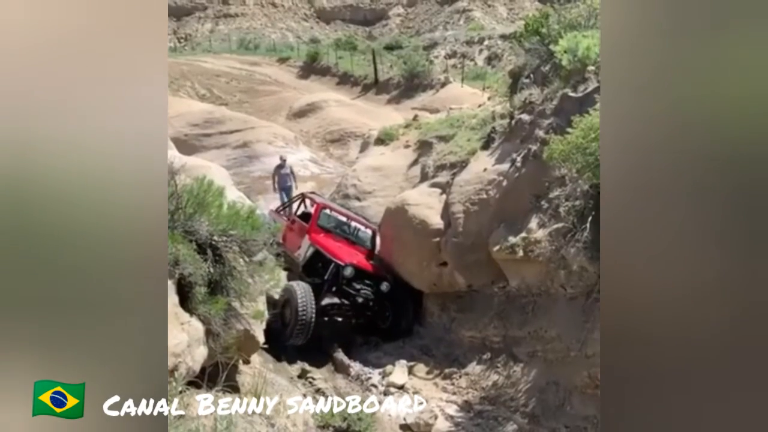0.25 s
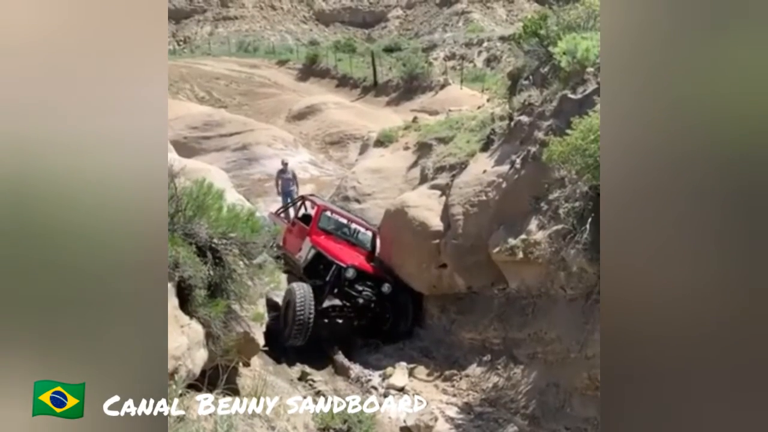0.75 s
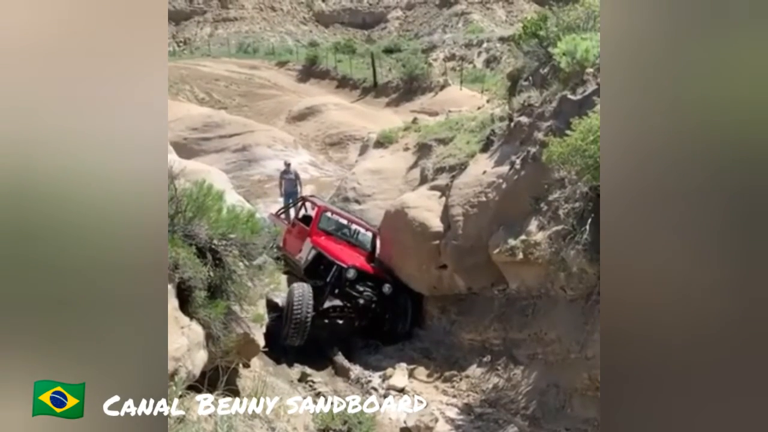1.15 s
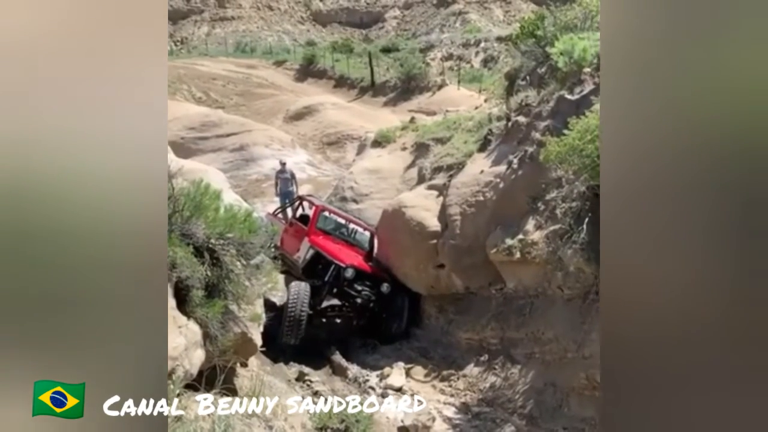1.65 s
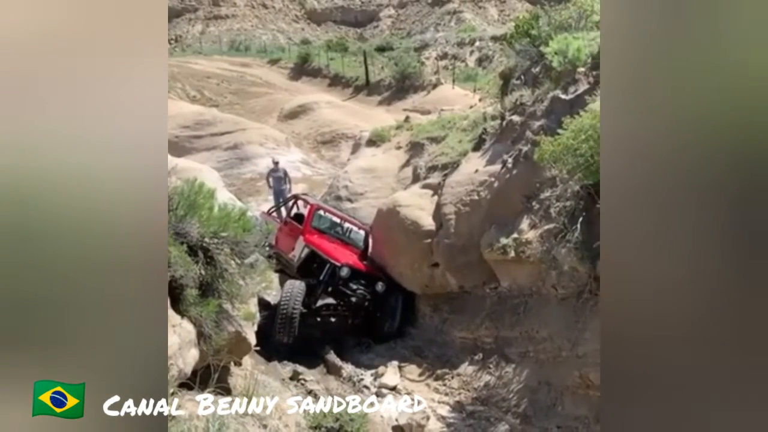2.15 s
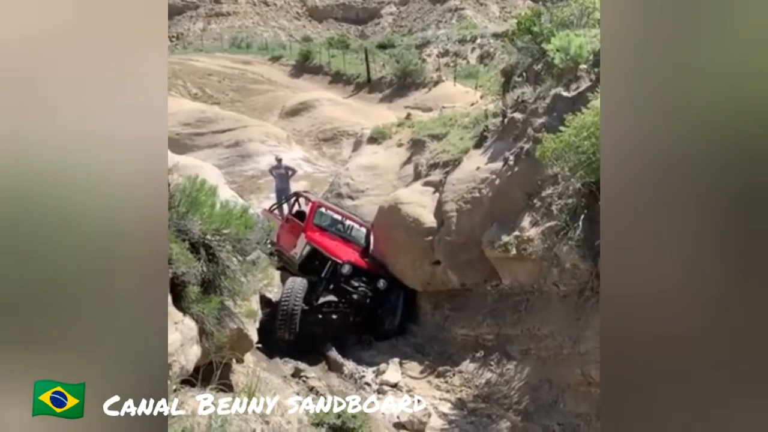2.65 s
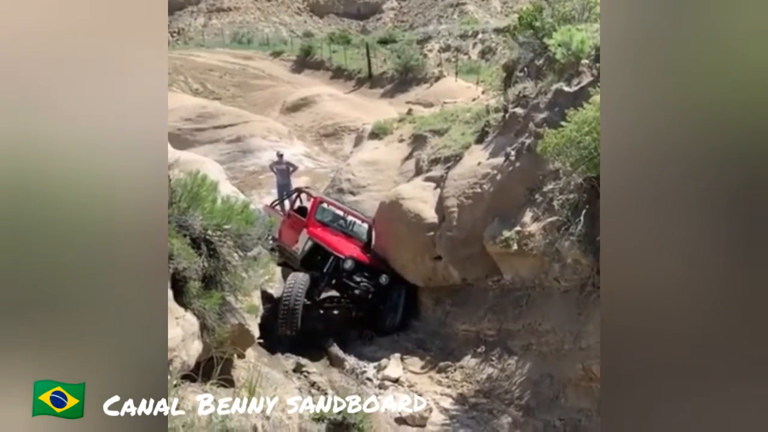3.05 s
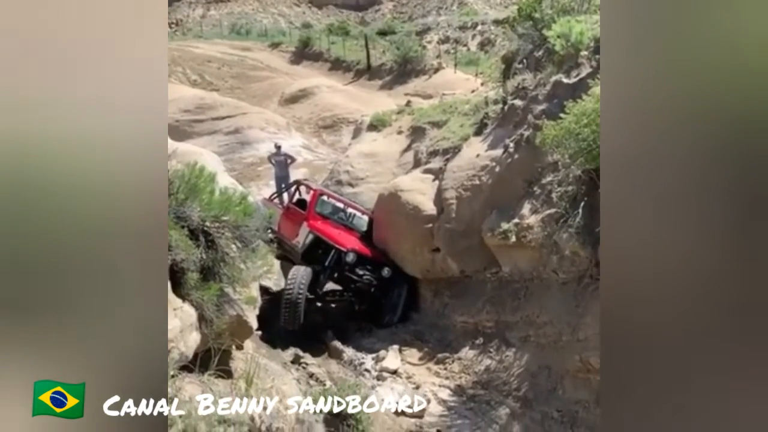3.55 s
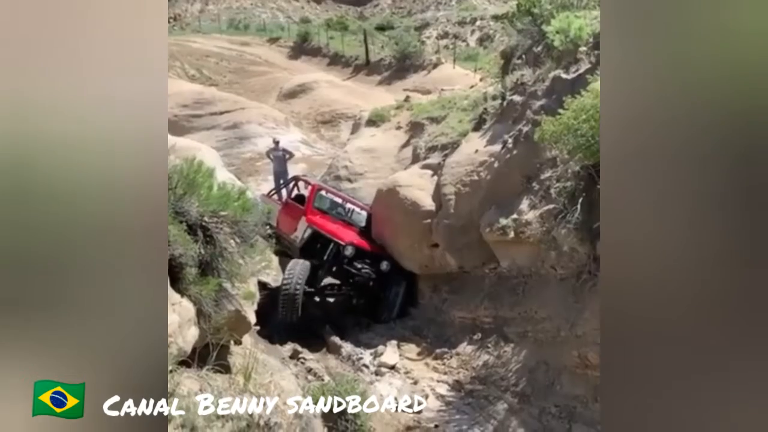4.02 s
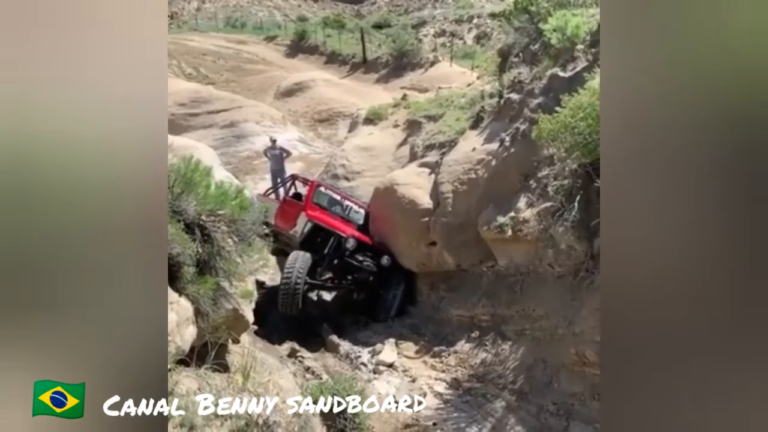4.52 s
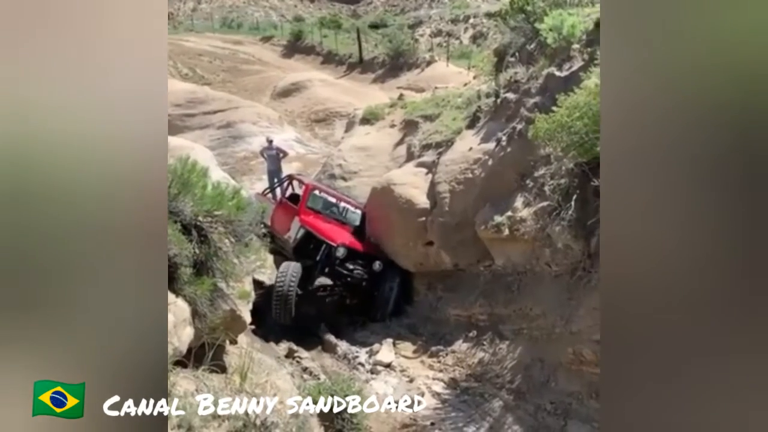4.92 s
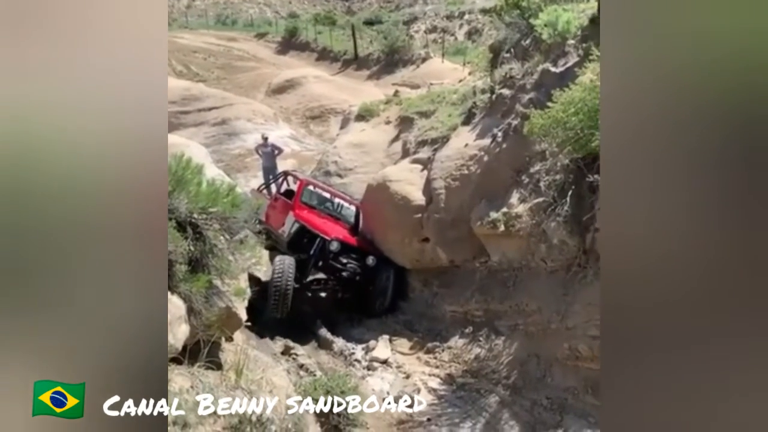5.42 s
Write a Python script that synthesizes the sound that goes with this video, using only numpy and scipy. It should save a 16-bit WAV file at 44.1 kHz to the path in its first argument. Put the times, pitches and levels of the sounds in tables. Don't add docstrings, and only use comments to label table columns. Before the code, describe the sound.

One mono microphone across a rocky gully hears a six-cylinder off-road vehicle. At the start the engine note falls, with an unsteady panel drone, and short grainy tyre scuffs on rock come at about 0.4 and 0.5 s. By 1.1 to 1.3 s it has lugged down to a slow, low throb. From 1.5 s the throttle opens and the pitch climbs quickly, pausing briefly near 3.0 to 3.3 s, then rising again into a strong tonal exhaust boom. Uneven burble, fan rush and valve hiss grow with it, and the panel hums around 2.5 to 3.5 s. A small metallic knock and rattle occur at 4.3 s. The engine peaks near 4.65 s as the driver lifts off; firing stumbles, a low chassis thump lands at 4.9 s, and the pitch falls. Rapid bright loose-metal ticks chatter from 5.45 to 5.65 s. Treble is muted at the very top.

```python
import sys
import numpy as np
from scipy import signal
from scipy.fft import rfft, irfft, next_fast_len
from scipy.io import wavfile
from scipy.ndimage import uniform_filter1d, map_coordinates

SR = 44100
rng = np.random.default_rng(int(sys.argv[2]) if len(sys.argv) > 2 else 0)


def output_pcm(signal):
    pcm = np.clip(np.atleast_2d(signal).T, -1, 1) * 32767
    wavfile.write(sys.argv[1], SR, np.round(pcm).astype(np.int16))


def volts(x):
    e = np.asarray(x, float) / 20
    return 10 ** e


N = 250399
T = np.arange(N) / SR
CRUISE_HZ = 80

# (frequency [Hz], level [dB])
PIPE = [(20, -16.5), (45, -7), (75, -14.5), (110, 0.5), (135, -3), (160, -3.5), (190, 6), (215, -1),
        (238, -3.5), (280, -8.5), (325, -4.5), (380, -24.5), (470, -21), (700, -74)]


def unit(x):
    return x / np.sqrt(np.mean(x ** 2) + 1e-20)


def along(points, hz):
    f, v = np.transpose(points)
    return np.interp(np.log(hz + 1), np.log(f + 1), v)


def curve(rows):
    s, v = np.transpose(rows)
    return np.interp(T, s, v)


def wobble(rate):
    return map_coordinates(rng.standard_normal(int(N * rate / SR) + 4), [T * rate])


def coloured(x, spectrum, smear=0):
    m = next_fast_len(N + 8192)
    hz = np.fft.rfftfreq(m, 1 / SR)
    inside = (hz >= spectrum[0][0]) & (hz <= spectrum[-1][0])
    delay = np.exp(-1j * np.pi * smear * hz ** 2)
    return irfft(rfft(x, m) * volts(along(spectrum, hz)) * inside * delay, m)[:N]


def noise(spectrum, patchy_db):
    z = signal.stft(rng.standard_normal(N), nperseg=512)[2]
    field = uniform_filter1d(rng.standard_normal(z.shape), size=5, axis=0)
    field = uniform_filter1d(field, size=9, axis=1)
    patchy = signal.istft(z * volts(patchy_db * unit(field)), nperseg=512)[1][:N]
    return unit(coloured(patchy, spectrum))


def driven(hz, throttle, cruise_db, per_octave_db, opened_db):
    return cruise_db + per_octave_db * np.log2(hz / CRUISE_HZ) + opened_db * throttle


def panel_hum():
    # (start [s], end [s], level [dB])
    hums = [
        (-.1, .55, -39.5),
        (0.96, 1.25, -36),
        (2.484, 3.55, -32.5),
    ]
    fade_db_per_s, floor_db = 56.5, -50
    outside = lambda start, end: np.maximum(np.maximum(start - T, T - end), 0)
    hum = sum(volts(level - fade_db_per_s * outside(start, end)) for start, end, level in hums)
    unsteady = volts(5.9 * np.tanh(wobble(17)))
    return (hum + volts(floor_db)) * np.sqrt(2) * unsteady * np.sin(2 * np.pi * 236 * T + 1.24 * wobble(14))


def loose_metal():
    # (time [s], peak level [dB])
    ticks = [(4.303, -49), (4.329, -32), (4.732, -38), (5.4484, -28), (5.474, -52), (5.4979, -35),
             (5.523, -27), (5.5464, -38), (5.57, -23.5), (5.5914, -29.5), (5.608, -42), (5.629, -25),
             (5.651, -51)]
    # (time [s], level [dB], decay by 60 dB [s])
    clank = [
        (4.28, -46, 1.6),
        (4.324, -44, 0.24),
    ]
    # (frequency [Hz], level [dB])
    metal = [(2500, -20), (3600, -1), (5000, -4), (6200, 0), (7500, -6), (8500, -5), (11500, -16)]
    burst = lambda s, level, t60: (T >= s) * volts(level - 60 * abs(T - s) / max(t60, .002))
    shape = sum(burst(s, peak - 12.5, .026) for s, peak in ticks)
    shape = shape + sum(burst(*row) for row in clank)
    return shape * noise(metal, patchy_db=4.5)


def tyre_scuffs():
    # (time [s], half length [s], level [dB])
    scuffs = [
        (.362, .016, -26.5),
        (.389, .013, -24.5),
        (.5, .018, -29.5),
        (2.659, .003, -30),
    ]
    # (frequency [Hz], level [dB])
    rubber = [(400, -18), (590, 5), (730, -4), (880, 2), (1100, -4), (1300, -2), (1650, -5), (2200, -7),
              (2700, -17), (3300, -30), (4500, -40)]
    grit = noise(rubber, patchy_db=.5)
    return grit * sum(volts(level) * np.exp(-((T - s) / half) ** 2) for s, half, level in scuffs)


def chassis_jolt():
    # (time [s], level [dB], pitch [Hz], decay by 60 dB [s])
    thumps = [
        (4.92, -15, 42, .08),
    ]
    return sum(volts(level - 60 * abs(T - s) / t60) * np.sin(2 * np.pi * pitch * (T - s))
               for s, level, pitch, t60 in thumps)


def engine_bay(hz, throttle, firings):
    # (frequency [Hz], density [dB per Hz])
    fan = [(300, -33), (383, -16), (460, -5), (590, -13.5), (690, -8.5), (751, -1), (810, -7), (903, -14),
           (1260, -12), (1620, -16), (1900, -17), (2400, -22), (3000, -31), (3900, -57)]
    valves = [(1410, -0.5), (2400, -11.5), (2550, -18), (3070, -3), (3670, -1.5), (4760, -11.5),
              (6120, -7.5), (7220, -11.5), (8330, -8), (9950, -15.5), (11300, -14.5), (12000, -21),
              (12300, -47), (16000, -73), (22000, -120)]
    intake = [(280, -19), (350, -2.5), (560, 1), (700, -8), (1000, -7), (2200, -10.5), (2450, -27),
              (3000, -36)]
    panel = [(1820, -45), (1900, 4), (1945, 0.5), (2020, -14.5)]  # (Hz, dB)
    fan_db = driven(hz, throttle, -33.5, 0.9, .6)
    valves_db = driven(hz, throttle, -46.5, 4.4, 0.37)
    panel_db = fan_db + driven(hz, throttle, -16.5, 5, 0.96) - 4.0
    panel_db = panel_db + 8.5 * np.exp(-((hz - 126.8) / 5) ** 2)
    intake_db = driven(hz, throttle, -42.5, 10, 0.89)

    throb = lambda depth: 1 + depth * np.cos(2 * np.pi * firings) + depth * np.cos(np.pi * firings)
    rush = volts(fan_db + 0.89 * wobble(9)) * throb(0.088) * noise(fan, patchy_db=1.4)
    hiss = volts(valves_db + 0.83 * wobble(10)) * throb(0.073) * noise(valves, patchy_db=2.0)
    ring = volts(panel_db) * noise(panel, patchy_db=0.0)
    roar = volts(intake_db + 0.64 * wobble(7)) * throb(0.18) * noise(intake, patchy_db=0.0)
    return rush + hiss + ring + roar


def silencer_rasp_db(hz, throttle):
    return driven(hz, throttle, -3.5, -1.4, -1.6) + 8 * np.clip((hz - 73.2) / 10.5, 0, 1)


def exhaust_thuds(hz, throttle):
    low = [(18, -16), (35, -6.5), (70, -1), (110, -17)]  # (Hz, dB)
    thuds_db = driven(hz, throttle, -29, 0, -5.5) + 3 * np.tanh(wobble(14))
    return volts(thuds_db) * noise(low, patchy_db=2.5)


def exhaust_burble(hz, throttle, firings):
    cylinders = [1.0, -.1, -.5, .1, -.2, -.3]
    at = np.flatnonzero(np.diff(np.floor(firings)))
    uneven = np.resize(np.subtract(cylinders, np.mean(cylinders)), len(at))
    scatter = .2 * rng.standard_normal(N)[:len(at)]
    blows = np.zeros(N)
    blows[at] = (uneven + scatter) / np.sqrt(hz[at])
    burble = unit(coloured(blows, PIPE, smear=2.5e-4)) + volts(-14) * noise(PIPE, patchy_db=2.2)
    rasp = coloured(burble, [(240, -30), (285, 0), (700, 0)])
    burble_db = driven(hz, throttle, -32.5, 4.4, -0.69) + 6
    return volts(burble_db) * (burble + (volts(silencer_rasp_db(hz, throttle)) - 1) * rasp)


def order_levels(hz, throttle):
    # (frequency [Hz], level [dB])
    firing = [(37, -18.5), (68, -16.5), (90, -19), (103, -18.5), (109, -11.5), (115, -9.5), (131, -9)]
    banks = [(60, -61), (93, -19), (120, -21), (134, -28.5), (143, -27), (164, -38.5), (182, -21.5),
             (196, -21.5)]
    double = [(96, -20.5), (145, -25), (158, -16), (172, -21.5), (183, -13.5), (206, -15), (216, -26.5),
              (250, -23.5)]
    triple = [(110, -28.5), (172, -34), (187, -18), (208, -22.5), (222, -29.5), (250, -33), (290, -37.5),
              (390, -47.5)]
    shut = [-10, -7, -6, -5]
    # (time [s], held [s], gain of the half-rate line [dB])
    stumbles = [
        (4.66, .22, 18),
        (5.11, .05, 17),
    ]
    rise_s, fade_db_per_s = 0.05, 114

    null = lambda f: -13 * np.exp(-((f - 80.3) / 4.4) ** 2)
    main = [along(path, k * hz) + null(k * hz) + shut_db * (1 - throttle)
            for k, path, shut_db in zip((1, 3 / 2, 2, 3), (firing, banks, double, triple), shut)]
    stumble_db = 0
    for s, held, gain_db in stumbles:
        rise = np.clip((T - s) / rise_s + 1, 0, 1)
        stumble_db = stumble_db + rise * np.clip(gain_db - fade_db_per_s * (T - s - held), 0, gain_db)
    return main + [-41 + stumble_db]


def exhaust_boom(hz, throttle, firings):
    # (multiple of the firing rate [1], level [dB])
    upper = [(2.5, -33.5), (3.5, -36), (4, -30.5), (5, -36.5), (6, -36)]
    flutter_db = .4 + 1.5 * (1 - throttle) * hz / CRUISE_HZ

    def tone(k, level_db):
        level = np.sqrt(2) * volts(level_db + flutter_db * wobble(26))
        return level * np.sin(2 * np.pi * k * firings + .05 * wobble(12) - .9 * np.pi)

    boom = sum(tone(k, level) for k, level in zip((1, 3 / 2, 2, 3, 1 / 2), order_levels(hz, throttle)))
    upper_db = driven(hz, throttle, -6.5, -1.9, 2)
    rasp_db = silencer_rasp_db(hz, throttle)
    for k, level in upper:
        raspy_db = rasp_db * np.clip((k * hz - 240) / 45, 0, 1)
        boom += tone(k, level + upper_db + along(PIPE, k * hz) + raspy_db)
    return boom


def scene():
    # (time [s], firing rate [Hz])
    engine = [(0, 65.07), (.55, 53.17), (1.14, 37.72), (1.29, 37.64), (1.5, 48.06), (1.85, 67.8),
              (2.05, 74.5), (2.3, 80.67), (2.75, 91.46), (3.0, 98.2), (3.35, 98.7), (3.52, 104),
              (3.77, 115.5), (4.02, 121.3), (4.55, 126.4), (4.67, 131.6), (5.0, 117.5), (5.68, 91.9)]
    # (time [s], opening [0-1; below 0 the engine brakes])
    pedal = [
        (0, 0),
        (.4, .2),
        (1.15, .3),
        (1.6, 1),
        (4.59, 1),
        (4.655, .08),
        (5.0, 0),
        (5.22, -.3),
        (5.5, .05),
    ]
    hz, throttle = curve(engine), curve(pedal)
    firings = np.cumsum(hz) / SR
    body = panel_hum() + loose_metal() + tyre_scuffs() + chassis_jolt()
    exhaust = exhaust_thuds(hz, throttle) + exhaust_burble(hz, throttle, firings)
    exhaust = exhaust + exhaust_boom(hz, throttle, firings)
    return (body + engine_bay(hz, throttle, firings) + exhaust)[None]


def roll_off(x):
    return signal.sosfilt(signal.butter(12, 13030, fs=SR, output="sos"), x)


def record(dry):
    held = dry / (1 + abs(dry / .8) ** 6) ** (1 / 6)
    return roll_off(held)


dry = scene()
out = record(dry)
output_pcm(out)
```